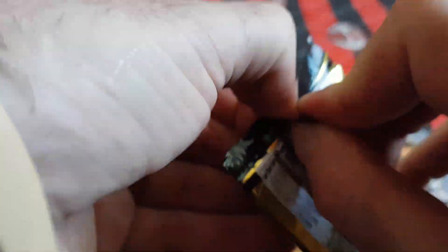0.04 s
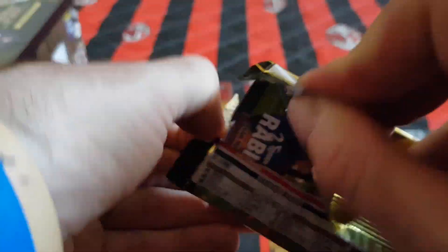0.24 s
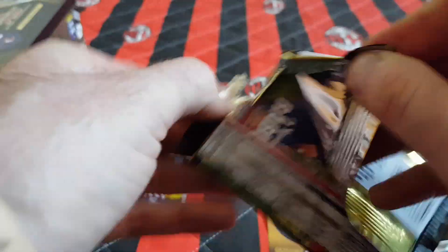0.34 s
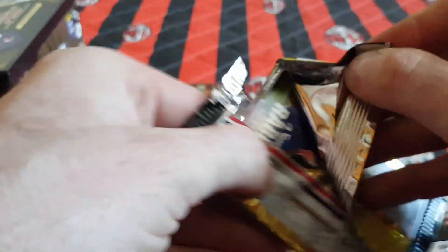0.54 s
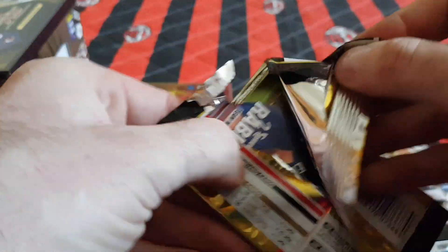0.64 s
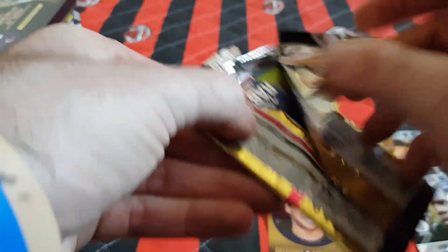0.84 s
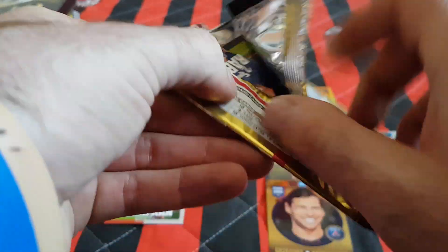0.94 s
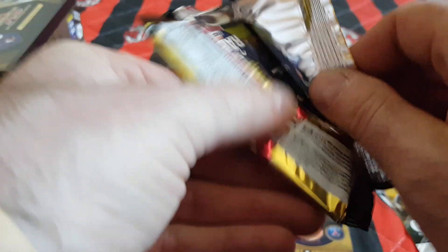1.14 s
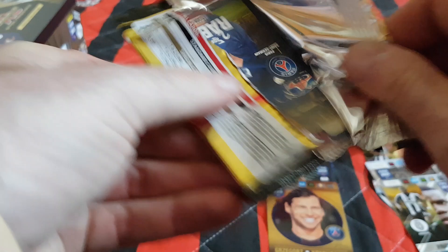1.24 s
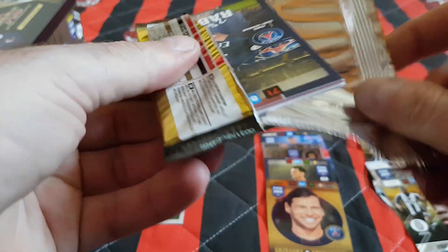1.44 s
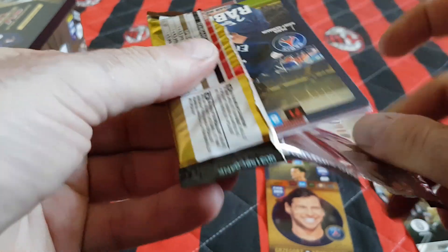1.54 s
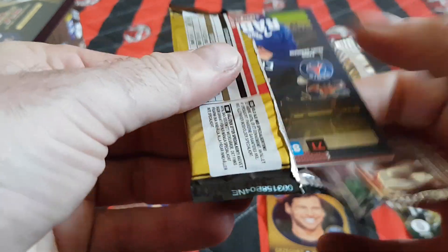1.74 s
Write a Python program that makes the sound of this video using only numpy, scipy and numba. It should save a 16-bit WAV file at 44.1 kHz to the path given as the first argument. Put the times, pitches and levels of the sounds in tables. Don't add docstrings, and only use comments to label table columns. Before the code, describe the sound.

A foil packet tears open in sharp snaps, then crinkles as it is pulled apart up close.

```python
import sys
import numpy as np
from scipy import signal
from scipy.fft import rfft, irfft
from scipy.io import wavfile
from numba import njit

SR = 44100
rng = np.random.default_rng(int(sys.argv[2]) if len(sys.argv) > 2 else 0)


def store_wav(level_fs):
    pcm = np.round(np.clip(np.atleast_2d(level_fs), -1, 1) * 32767)
    wavfile.write(sys.argv[1], SR, pcm.T.astype(np.int16))


def level_to_linear(level):
    exponent = np.asarray(level, float) / 20
    return 10 ** exponent


N = 79380


def curve_db(points, hz):
    corner_hz, level_db = np.array(points).T
    return np.interp(np.log(np.maximum(hz, 1)), np.log(corner_hz), level_db)


# (frequency [Hz], level [dB])
ROOM_SPECTRUM = [(25, -1), (70, -7), (200, -1), (340, -19), (1000, -24), (2000, -22), (9300, -43),
                 (16000, -40)]
ROOM_DB = -59.5
HUM_HZ, HUM_WIDTH_HZ, HUM_DB = 182, 9, -64


def room_tone():
    hz = np.arange(N // 2 + 1) * SR / N
    middle, side, hum = rfft(rng.standard_normal((3, N)))
    width = np.clip(hz / 2000, .35, 1) * np.array([[1], [-1]])
    air = irfft((middle + width * side) * level_to_linear(curve_db(ROOM_SPECTRUM, hz)), N)
    hum = irfft(hum / (1 + ((hz - HUM_HZ) / HUM_WIDTH_HZ) ** 2), N)
    return air * level_to_linear(ROOM_DB) / air.mean(0).std() + hum * level_to_linear(HUM_DB) / hum.std()


@njit
def ring(at, hz, cycles, size, phase, n, sr):
    y = np.zeros(n)
    for g in range(len(at)):
        s = 2j * np.pi * hz[g] / sr - 2.3 * hz[g] / (cycles[g] * sr)
        first = int(at[g] * sr) + 1
        z = size[g] * np.exp(1j * phase[g] + s * (first - at[g] * sr))
        turn = np.exp(s)
        last = min(n, first + int(3 * cycles[g] * sr / hz[g]))
        for j in range(max(first, 0), last):
            y[j] += z.imag * min(1., (j - first + 1) / 4)
            z *= turn
    return y


# (time [s], left minus right level [dB])
HANDS = [
    (0, 4),
    (.6, 2),
    (1.3, 4),
    (1.55, 0),
]
PORT_LAG_S, ALIKE_HZ = .00004, 3100


def ports(at, hz, cycles, db):
    at, hz, cycles, db = (np.ravel(v) * 1. for v in np.broadcast_arrays(at, hz, cycles, db))
    size_luck, phase, phase_luck = rng.standard_normal((len(at), 3)).T
    unlike = np.clip(hz / ALIKE_HZ, 0, 3)
    pan_db = np.interp(at, *np.array(HANDS).T) + 1.5 * unlike * size_luck.clip(-2, 2)
    hz = np.clip(hz, 30, .42 * SR)
    left_phase = 2 * phase
    right_phase = left_phase + 1.55 * unlike * phase_luck
    left = ring(at, hz, cycles, level_to_linear(db + pan_db / 2), left_phase, N, 1. * SR)
    right = ring(at + PORT_LAG_S, hz, cycles, level_to_linear(db - pan_db / 2), right_phase, N, 1. * SR)
    return np.array([left, right])


# (time [s], peak level [dB], pitch [Hz])
THUMPS = [
    (0.247, -22, 292),
    (0.288, -31, 197),
    (0.603, -39, 75.4),
    (1.09, -33.5, 167),
    (1.303, -30, 288),
    (1.386, -29.5, 116.5),
    (1.426, -32, 227),
    (1.533, -32.5, 258),
    (1.58, -35.5, 280),
    (0.814, -38, 113),
]


def thumps():
    at, db, hz = np.array(THUMPS).T
    return ports(at[:, None], hz[:, None] * [1, 1.6], 2.8, db[:, None] - [1.5, 7])


BODY_CYCLES, TREBLE_CYCLES, SIDE_MODE_DB = 3.4, 5.22, -11


def click(at, db, hz, treble_db):
    u = rng.random((len(at), 20))
    at, db, hz, treble_db = (v[:, None] for v in (at, db, hz, treble_db))
    body = ports(at, hz, BODY_CYCLES, db - 1.0)

    side_hz = 600 * 8.67 ** u[:, 3:6]
    side_db = db + SIDE_MODE_DB - 6 * u[:, 6:9]
    neighbours = ports(at + 0.00034 * u[:, :3], side_hz, BODY_CYCLES, side_db)

    step = np.arange(6)
    top_hz = 4600 + 1900 * (step + u[:, 14:20])
    lean_db = np.clip(treble_db - db - 3, 0, 12) * 0.23 * (step - 3)
    top_db = treble_db - 9 * u[:, 2:8] + lean_db
    return body + neighbours + ports(at + 0.00037 * u[:, 9:15], top_hz, TREBLE_CYCLES, top_db)


# (time [s], crackle level [dB])
EFFORT = [
    [(0, -57.5), (.11, -64.5), (.16, -70), (.208, -55.5), (.217, -32), (.27, -36.5), (.32, -39),
     (.36, -58.5), (.40, -41.5)],
    [(.48, -61), (.56, -47.5), (.62, -50.5), (.66, -47), (.69, -58), (.74, -42), (.775, -35), (.82, -37.5),
     (.86, -52)],
    [(.93, -46), (.99, -52), (1.18, -51), (1.272, -44.5), (1.30, -29), (1.39, -29), (1.41, -40),
     (1.45, -49)],
    [(1.53, -49), (1.6, -56), (1.67, -70), (1.72, -47), (1.76, -66.5), (1.8, -64)],
]
# (time [s], tilt to the body [dB])
DULL = [(0, 0.5), (.25, 0.5), (.45, 3.5), (.82, 3.5), (1.0, 2.5), (1.35, 5.5), (1.8, 4)]
CRACKLE_PER_S, CRACKLE_SPREAD_DB = 2200, 2.8
CLUSTERS_PER_S, CLUSTER_DB = 130, 2.1


def crackle():
    effort = np.concatenate([np.array(e) for e in EFFORT])
    u = rng.random((5000, 4))
    at = np.cumsum(-np.log(1 - u[:, 0])) / CRACKLE_PER_S
    cluster = np.interp(at * CLUSTERS_PER_S, np.arange(600), rng.standard_normal(600))
    db = np.interp(at, *effort.T)
    db = db + CLUSTER_DB * cluster * np.clip(-(db + 9) / 20, .3, 1.5)
    db = db - CRACKLE_SPREAD_DB * np.log(1 - .98 * u[:, 1])
    dull = np.interp(at, *np.array(DULL).T)
    handling = ports(at[::9], 150 * 3.25 ** u[::9, 3], BODY_CYCLES, db[::9] - 9.5)
    hz = 520 * 7.54 ** u[:, 2] ** 1.466
    return handling + click(at, db + dull, hz, db - dull + 7.0 - 9 * u[:, 3])


# (time [s], peak level [dB])
SLIPS = [(0.0012, -40.5), (0.0068, -36), (0.0114, -38), (0.0189, -45), (0.0222, -37), (0.0265, -42),
         (0.0308, -39), (0.0344, -46), (0.038, -47), (0.0412, -42), (0.0454, -43), (0.052, -34),
         (0.059, -37), (0.0657, -37), (0.0717, -41), (0.0776, -36), (0.0867, -48.5)]
CREAK_HZ, CREAK_SAG_HZ_PER_S, CREAK_CYCLES, CREAK_DB = 2600, 3600, 6.0, -0.5


def creak():
    at, db = np.array(SLIPS).T[:, :, None]
    db = db + CREAK_DB
    detune = 1 + 0.037 * rng.standard_normal((len(at), 2))
    hz = (CREAK_HZ - CREAK_SAG_HZ_PER_S * at) * detune
    rasp = ports(at + [0, 0.0004], hz, CREAK_CYCLES, db)
    return rasp + ports(at, [3360, 4950, 6700, 8100], 5.8, db - 9.5)


# (time [s], peak level [dB], body pitch [Hz], treble level [dB])
TICKS = [(0.1026, -42, 2980, -51), (.1085, -38, 3200, -38), (0.369, -42, 1380, -33), (.4100, -30, 900, -29),
         (.4389, -34, 690, -35), (.4510, -31.5, 775, -33.5), (.4630, -31, 780, -40),
         (0.4658, -34.5, 766, -50), (.4788, -42, 950, -53), (.4876, -48, 2750, -47),
         (.4985, -31.5, 814, -53), (0.5004, -33, 890, -45), (.5054, -36, 990, -46),
         (0.5152, -33, 1800, -36), (0.5796, -29, 1650, -39), (.6313, -44, 4440, -31),
         (0.641, -41, 690, -27), (.6633, -29.5, 4180, -27), (0.6699, -28, 1120, -34),
         (.7550, -22, 600, -26), (0.779, -25.5, 1360, -20), (.7852, -20, 645, -26),
         (0.808, -25, 1270, -24.5), (.8590, -31, 640, -50), (0.8954, -28.5, 576, -47),
         (0.915, -25, 4260, -28), (.9480, -31, 2020, -34), (.9551, -47, 2100, -30.5),
         (0.9758, -46, 605, -38), (0.998, -32, 1210, -57), (1.0100, -35, 1490, -43),
         (1.0340, -36, 2520, -41), (1.0736, -37, 1580, -38), (1.0880, -31, 794, -44),
         (1.1987, -31, 1410, -35), (1.2165, -40, 2400, -28), (1.2236, -49, 900, -29),
         (1.2779, -20.5, 1850, -33), (1.3014, -17.5, 740, -13), (1.329, -17, 910, -19.5),
         (1.3402, -15.5, 1680, -30), (1.3722, -19, 1250, -18), (1.4665, -40, 2750, -50),
         (1.4930, -26, 724, -47), (1.4994, -26, 1500, -39), (1.5682, -41, 775, -44),
         (1.7170, -33.5, 1800, -28), (1.7803, -52, 4390, -52)]
TICK_DB, TICK_TREBLE_DB = 3.5, 3.5


def ticks():
    at, db, hz, treble = np.array(TICKS).T
    db, treble = db + TICK_DB, treble + TICK_TREBLE_DB
    u = rng.random((len(at), 2)).T
    gap = 0.000626 + 0.001444 * u[0]
    second = click(at + gap, db - 3.0, hz * 2.17 ** (u[1] - .5), treble - 7.0)
    return click(at, db, hz, treble) + second


# (time [s], peak level [dB], body pitch [Hz], treble level [dB])
SNAPS_TEAR = [(0.0415, -48, 1130, -22), (0.098, -42, 2950, -20), (0.1332, -40.5, 4400, -32.5),
              (0.1726, -27, 4100, -29), (0.202, -28.5, 1590, -31.5), (0.2152, -16, 3000, -8),
              (0.2179, -11.5, 1820, -4), (0.222, -12, 1470, -13), (0.231, -16, 1810, -67),
              (0.2468, -8.5, 1425, -27), (0.2489, -11, 1010, -3), (0.2647, -13, 1480, -38),
              (0.2845, -16.5, 2840, -25), (0.3025, -14, 4270, -8), (0.377, -28, 2810, -21.5),
              (0.3905, -19, 3900, -23), (0.3953, -15.5, 920, -15.5), (0.4253, -29, 820, -23.5)]
SNAPS_FOLD = [(0.5333, -31.5, 1340, -28), (0.5488, -15, 720, -15.5), (0.5649, -24.5, 2500, -19),
              (0.5905, -18.5, 3100, -17), (0.5944, -33, 2930, -8.5), (0.6451, -53, 760, -20),
              (0.656, -26.5, 2850, -19), (0.6887, -26, 4200, -17), (0.7036, -28.5, 1800, -24),
              (0.7087, -16, 710, -44), (0.7272, -21, 4300, -22), (0.7332, -38, 2370, -22),
              (0.7478, -27, 4170, -17.5), (0.7633, -23, 960, -10), (0.8156, -15.5, 1650, -15),
              (0.8362, -12.5, 1250, -22), (0.873, -18.5, 890, -14), (0.8994, -10.5, 2550, -11.5),
              (0.9107, -15.5, 1900, -13), (0.93, -27, 2480, -15), (0.9389, -24.5, 2940, -15),
              (0.9698, -27, 2710, -35), (1.0177, -21, 1770, -16), (1.0458, -30.5, 1860, -33)]
SNAPS_PULL = [(1.1016, -14.5, 1470, -17), (1.1151, -19.5, 2770, -26), (1.1236, -17.5, 4300, -15),
              (1.1385, -17.5, 1350, -22), (1.1456, -11, 2460, -15), (1.1491, -41, 4400, -12),
              (1.2038, -11.5, 2810, -10.5), (1.2266, -25, 3260, -21), (1.2439, -13.5, 2400, -16),
              (1.2847, -13, 1670, -10), (1.2956, -15, 2550, -2), (1.3101, -5.5, 1360, -11),
              (1.3177, -9, 800, -9.5), (1.3221, -12.5, 2360, -26), (1.3475, -22, 720, -11.5),
              (1.3565, -7, 1720, -7.5), (1.3647, -5.5, 1190, -12), (1.3797, -8, 1480, -13),
              (1.3888, -5, 724, -28), (1.4037, -31, 1260, -15)]
SNAPS_END = [(1.4741, -17.5, 1280, -39), (1.4877, -27, 1580, -20.5), (1.504, -21.5, 1560, -32),
             (1.514, -22.5, 980, -39), (1.5241, -17, 2750, -20.5), (1.5309, -14, 4450, -20.5),
             (1.579, -28.5, 1700, -20.5), (1.6108, -34, 1930, -55), (1.6891, -26.5, 1810, -23),
             (1.7223, -33, 482, -31.5), (1.7258, -25, 650, -35), (1.7758, -28.5, 2070, -31)]
TREBLE_DB = -2
RATTLE_S, RATTLE_DB, RATTLE_LEAD_S = 0.0031, -11, 0.001232


def snaps():
    at, db, hz, treble = np.array(SNAPS_TEAR + SNAPS_FOLD + SNAPS_PULL + SNAPS_END).T
    treble = treble + TREBLE_DB
    u = rng.random((len(at), 6, 3))
    late = -RATTLE_S * np.log(1 - u[..., 0]) - RATTLE_LEAD_S
    fall = RATTLE_DB - 7 * u[..., 1] - 900 * abs(late)
    rattle_at = (at[:, None] + late).ravel()
    rattle_db = (db[:, None] + fall).ravel()
    rattle_hz = (hz[:, None] * 2.0 ** (u[..., 2] - .5)).ravel()
    rattle_treble = (treble[:, None] + fall).ravel()
    return click(at, db, hz, treble) + click(rattle_at, rattle_db, rattle_hz, rattle_treble)


# (frequency [Hz], level [dB])
MIC_TONE = [(300, -5), (700, -6.5), (2500, 2.5), (4000, 5), (7600, 5.5), (9300, -5), (11000, 1.5),
            (15500, 2.5)]


def through_mic(x):
    log_gain = curve_db(MIC_TONE, np.arange(513) * SR / 1024) * np.log(10) / 20
    cepstrum = irfft(log_gain)
    cepstrum[1:512] *= 2
    cepstrum[513:] = 0
    impulse = irfft(np.exp(rfft(cepstrum)))
    return signal.fftconvolve(x, impulse[None], axes=1)[:, :N]


def room_echo(x):
    t60_s, echo_db = .14, -17
    t = np.arange(8000) / SR
    tail = rng.standard_normal((2, 8000)) * level_to_linear(-60 * t / t60_s) * (t > .003)
    tail = tail / np.sqrt((tail ** 2).sum(1, keepdims=True))
    return level_to_linear(echo_db) * signal.fftconvolve(x, tail, axes=1)[:, :N]


def scene():
    foil = through_mic(creak() + crackle() + ticks() + snaps())
    return room_tone() + thumps() + foil + room_echo(foil)


def roll_off(x):
    return signal.sosfilt(signal.butter(12, 16970, fs=SR, output="sos"), x)


def record(dry):
    low_cut = signal.butter(2, 90, "high", fs=SR, output="sos")
    top_cut = signal.ellip(8, .5, 30, 15850, fs=SR, output="sos")
    mix = signal.sosfilt(np.vstack([low_cut, top_cut]), np.tanh(dry))
    return roll_off(mix)


dry = scene()
out = record(dry)
store_wav(out)
```